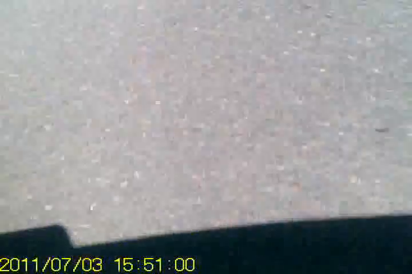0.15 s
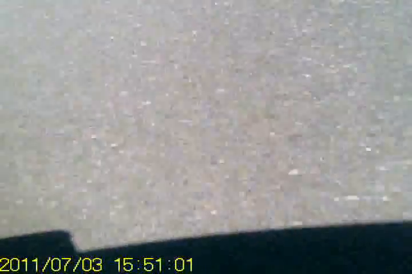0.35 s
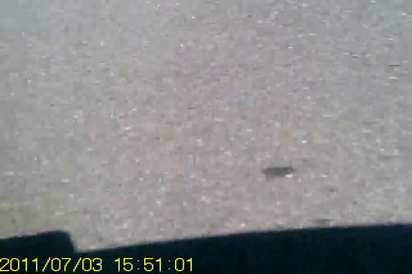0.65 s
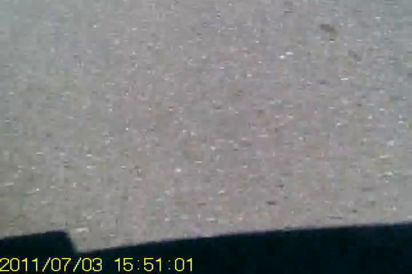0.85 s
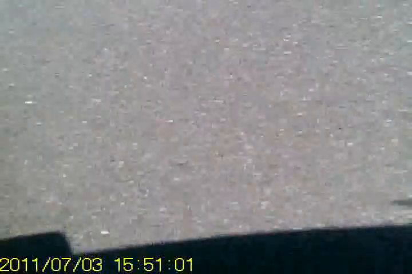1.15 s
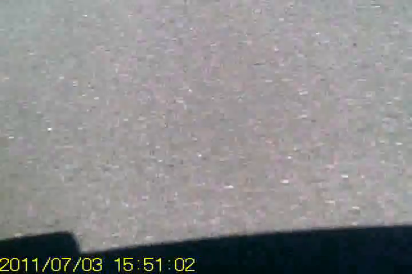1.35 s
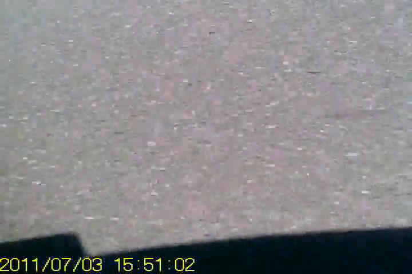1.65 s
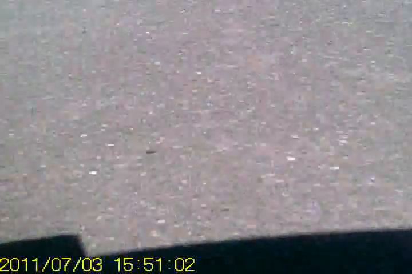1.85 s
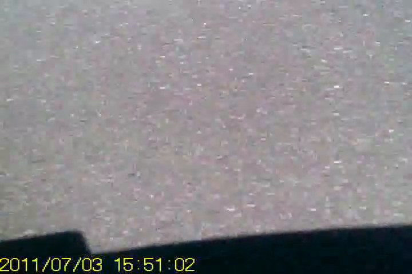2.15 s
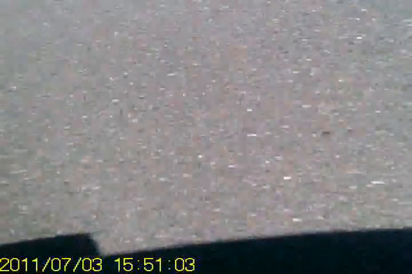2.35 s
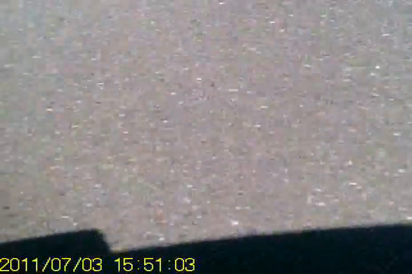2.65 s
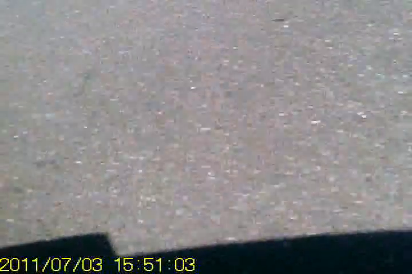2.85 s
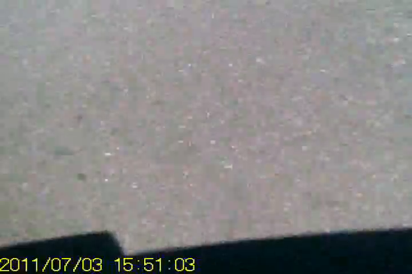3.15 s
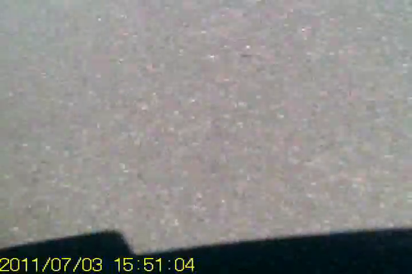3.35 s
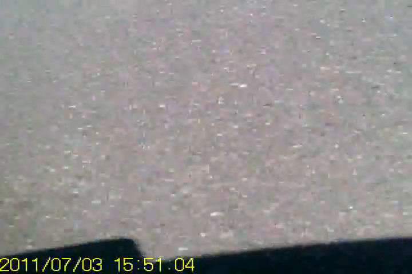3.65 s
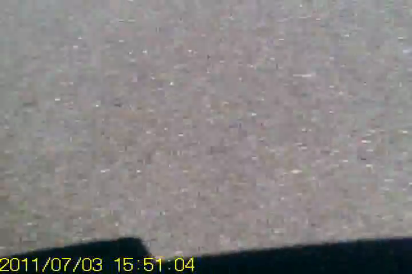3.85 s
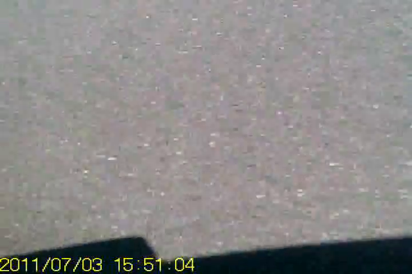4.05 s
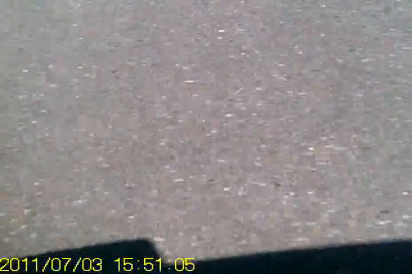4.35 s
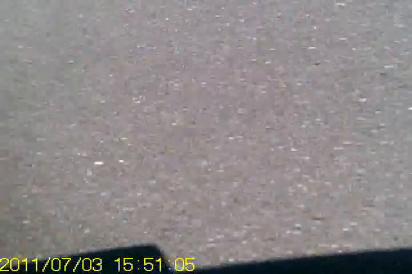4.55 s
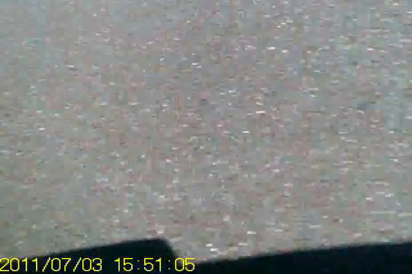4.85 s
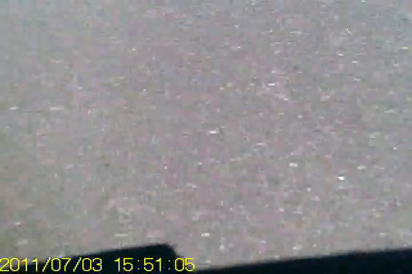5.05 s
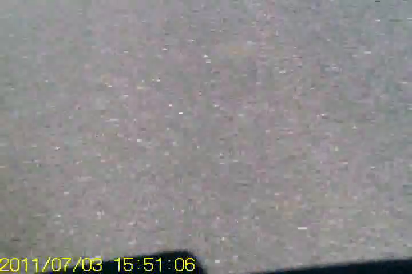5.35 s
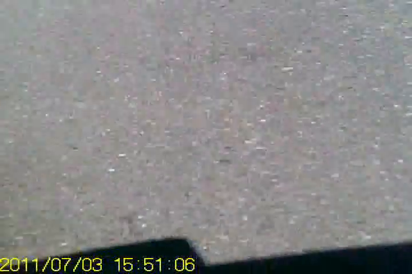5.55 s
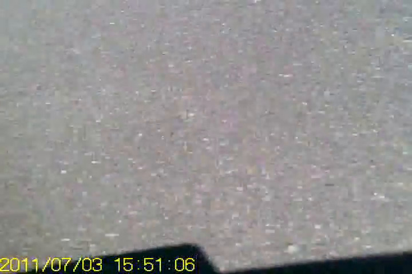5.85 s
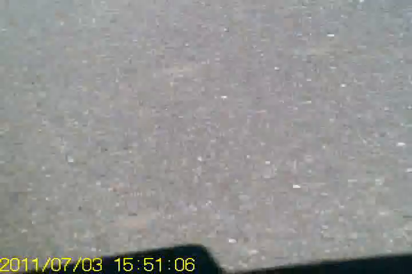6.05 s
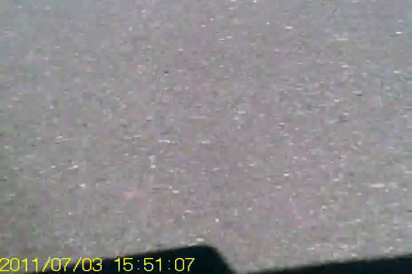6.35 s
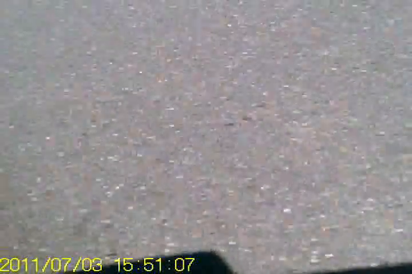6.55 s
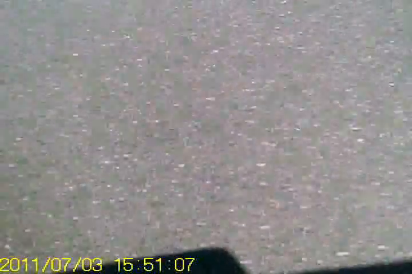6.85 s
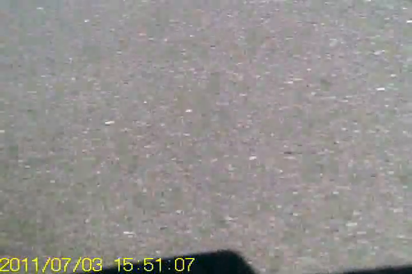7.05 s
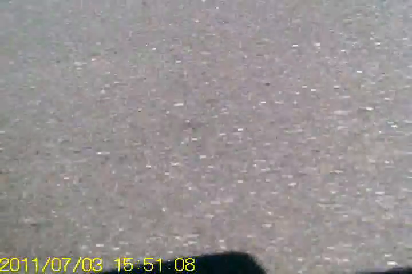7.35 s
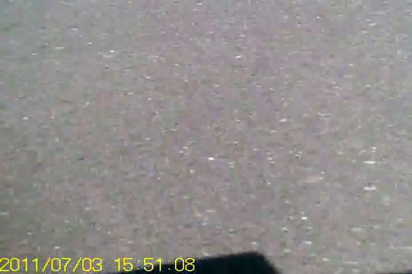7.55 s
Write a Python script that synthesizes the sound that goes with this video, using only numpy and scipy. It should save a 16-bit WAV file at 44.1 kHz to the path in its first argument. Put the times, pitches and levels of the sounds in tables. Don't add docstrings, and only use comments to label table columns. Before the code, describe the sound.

A cheap microphone rides near a small four-cylinder car's tailpipe on open road. From 0 to 3.6 seconds the engine pulls under load: after a brief initial drop, a thick low boom near 130 Hz with gritty rasp and pulsing gas hiss creeps up slightly. At 3.65 the throttle lifts and the exhaust goes soft, its pitch sagging until 4.5. A hard blip with punchy firings shoots the pitch up by 4.8; it cuts back, dips around 5.2, then rises as the engine takes up at 5.4. The rest is overrun, slowly falling, hollow and nasal, with small coughs near 5.8 and 6, and fluttering misfires after 6.2. Tyre roar grows later, wind heaves low, and faint fizzes recur roughly every 0.4 seconds. Grit ticks and bumps cluster around 4.1, 5.1 and 7.26, with a deep thump at 7.63. Very faint whistles sit underneath.

```python
import sys
import numpy as np
from scipy import signal
from scipy.fft import rfft, irfft, next_fast_len
from scipy.io import wavfile
from scipy.ndimage import uniform_filter1d

SR = 44100
rng = np.random.default_rng(int(sys.argv[2]) if len(sys.argv) > 2 else 0)


def wav_record(signal):
    frames = np.transpose(np.atleast_2d(signal))
    bounded = np.clip(frames, -1, 1)
    quanta = np.round(bounded * 32767).astype(np.int16)
    wavfile.write(sys.argv[1], SR, quanta)


def volts_from_decibels(level):
    exponent = np.asarray(level, float) / 20
    return 10 ** exponent


N = 340011

# [t/s at half way, duration/s]
STAGE_CHANGES = [
    (3.647, 0.039),
    (4.526, .03),
    (4.835, 0.037),
    (5.36, .12),
]
# [t/s, f/Hz]
CRANK_SPEED = [(0, 71.3), (.11, 64), (.5, 64.48), (3.15, 66.46), (3.48, 67.17), (3.7, 65.1), (4.22, 64.66),
               (4.4, 59.46), (4.51, 56.1), (4.6, 61.04), (4.81, 83.95), (4.9, 82.7), (5.1, 75.9),
               (5.18, 74.55), (5.33, 82.24), (5.43, 86.3), (5.7, 84.17), (7.71, 74.91)]
# [t/s, level/dB]
GAS_PUSH = [(0, 3.5), (.075, -0.5), (.105, 4), (.15, 0), (3.0, -1.5), (3.6, -2), (4.2, -0.5), (4.5, -0.5),
            (4.55, 1.5), (4.66, -2), (4.8, 0), (4.91, -4.5), (5.3, -1.5), (5.45, 1), (5.85, -2), (6.4, 0),
            (7.05, 1), (7.71, -0.5)]

STAGE_THROTTLE = (0.95, .25, 0.85, 0.15, 0.05)
# boom, mid silencer slope [level/dB]
STAGE_BOOM_DB = (-16, -25.5, -15.5, -21.5, -20.5)
STAGE_TURN_DB = (-26, -32, -23.5, -30.5, -27)
STAGE_RASP_DB = (-31, -46, -29, -28, -27.5)
STAGE_ODD_DB = (-9.5, -21, -9, -15, -7)
STAGE_PAIR_DB = (1.5, 2.5, 1.5, -12, -8)
STAGE_GAS_DB = (-7, -20, -10, -26, -24)
STAGE_HISS_DB = (-52, -56, -51.5, -56, -54)
STAGE_SHAKE_RAD = (0, .005, .035, .005, .01)

# [crank f/Hz, level/dB]
SILENCER_GAIN = [(56, 4.5), (60, 0.5), (64.5, 0.5), (68, 0.5), (73, -6.5), (84, -5)]
# [multiple, open level/dB, shut level/dB]
TURN_ORDERS = [(.5, -16.5, -9), (1.5, -8.5, -27), (2.5, -14, -28.5), (3, -0.5, -34.5), (3.5, -12, -42.5),
               (5, -12.5, -42.5), (13.5, -26.5, -23.5)]
# [f/Hz, open throttle level/dB, shut throttle level/dB]
PIPE_RESPONSE = [(200, -2.5, -16), (255, 1.5, -18.5), (320, 1.5, -6), (404, -5, -19), (460, -4.5, -15),
                 (524, -15, -4.5), (591, -4.5, 2.5), (641.6, 0, -0.5), (681, -2, 0), (745.5, 2.5, -3.5),
                 (857, -10.5, -19), (945, -20.5, -44.5), (1080, -18.5, -24), (1330, -34, -44)]
# [t/s, rasp change level/dB]
MISFIRES = [(6.215, 1.5), (6.33, 2.5), (6.449, 0), (6.56, -1.5), (6.775, -3), (6.9, -2.5), (7.105, 1.5),
            (7.144, -5), (7.21, -5), (7.365, -0.5), (7.46, -2), (7.625, 1)]
# [f/Hz, level/dB per Hz]
HISS_SPECTRUM = [(1650, -27.5), (2800, 3), (3210, -14.5), (3600, -8), (3970, -1), (4420, -1), (4890, -3.5),
                 (5830, 0), (6690, -6), (7230, -5.5), (8060, -3), (9030, -7), (9880, -3.5), (10400, -6.5),
                 (11800, -22.5), (15300, -64), (22000, -120)]
# [start t/s, end t/s, f/Hz, rms level/dB]
WHISTLE_TONES = [
    (0, 3.5, 1736, -57.5),
    (5.6, 14, 4040, -67.5),
]

# [t/s, roar level/dB]
ROAD_ROAR = [(0, -39), (.3, -43), (3.5, -42.5), (3.7, -46.5), (4.05, -44), (4.4, -43), (5.3, -42),
             (6.4, -39.5), (6.85, -40), (7.0, -37), (7.2, -38), (7.71, -38)]
# [f/Hz, level/dB per Hz]
ROAR_SPECTRUM = [(120, -27.5), (200, -5.5), (330, -6), (450, -7.5), (600, -2), (800, -7.5), (1010, -8),
                 (1490, -6.5), (1870, -13.5), (2600, -16), (3110, -26), (3600, -29.5), (4680, -36)]
# [t/s, sway level/dB, wind level/dB]
GUST_EVENTS = [(.19, 2.5, 4.5), (.55, 1, 8.5), (2.04, 9.5, -2), (2.26, 14.5, 8), (2.52, 8, -3),
               (3.45, 7, 9), (3.8, 8.5, 0.5), (4.1, 10.5, 8), (4.43, 5, 4), (4.86, 9, 1.5), (5.2, 4, -5),
               (5.47, 3, 2), (5.71, 15.5, -2), (6.1, 13.5, -2), (6.4, 12, 5), (6.58, 7.5, 6), (6.99, 18, 5),
               (7.14, 2, 6.5), (7.28, 16, 5), (7.42, 11, 9), (7.62, 17, 11.5)]
# [f/Hz, level/dB per Hz]
WIND_SPECTRUM = [(16, -11.5), (24, 5), (34, -3.5), (55, -7), (95, -9), (130, -17), (250, -26.5), (500, -37)]
# [f/Hz, level/dB per Hz]
SWAY_SPECTRUM = [(2, -16), (5, -3.5), (12, 12.5), (20, -16)]
# [t/s, rms level/dB]
STORE_EVENTS = [(.37, -67), (0.78, -58), (1.214, -54.5), (1.613, -63), (2.043, -50.5), (2.482, -54.5),
                (2.87, -54), (3.307, -51), (3.773, -53), (4.201, -54), (4.591, -61), (5.044, -49.5),
                (5.47, -51), (5.908, -50.5), (6.307, -49.5), (6.72, -56), (6.99, -51), (7.049, -52.5),
                (7.14, -52.5), (7.49, -52)]
# [f/Hz, level/dB per Hz]
FIZZ_SPECTRUM = [(1500, 4), (3000, 0.5), (9500, -0.5), (11000, -16), (12300, -10.5)]
# [t/s, peak level/dB, ring f/Hz]
GRIT_TICKS = [
    (3.768, -53, 4500),
    (4.085, -40, 4060),
    (4.148, -38, 4500),
    (4.292, -33.5, 2890),
    (5.095, -44, 5000),
    (5.117, -35, 3320),
    (7.258, -32, 3400),
    (7.275, -35, 3616),
]
# [t/s, peak level/dB, ring f/Hz]
BUMP_KNOCKS = [
    (4.06, -29, 230.3),
    (4.092, -16.5, 69.6),
    (4.15, -25, 252),
    (4.547, -16.5, 360),
    (4.6, -22, 333.5),
    (4.647, -19.5, 320),
    (4.87, -30, 149.7),
    (5.12, -26, 200),
    (7.265, -16, 190.7),
    (7.635, -16, 60.3),
]


def rms_one(x):
    return x / np.sqrt(np.mean(x ** 2) + 1e-20)


def drift(rate_hz):
    hop = 40
    r = np.exp(-2 * np.pi * rate_hz * hop / SR)
    noise = rng.standard_normal(N // hop + 2002)
    slow = signal.lfilter([1], [1, -2 * r, r * r], noise)[2000:]
    return np.interp(np.arange(N) / hop, np.arange(len(slow)), rms_one(slow))


def coloured(spectrum):
    hz, db = np.transpose(spectrum)
    size = next_fast_len(N)
    log_hz = np.log(np.arange(size // 2 + 1) * SR / size + .1)
    knots = np.log([hz[0] / 2, *hz, hz[-1] * 1.2])
    shape_db = np.interp(log_hz, knots, [db[0] - 40, *db, db[-1] - 110])
    return rms_one(irfft(rfft(rng.standard_normal(size)) * volts_from_decibels(shape_db), size)[:N])


def in_time(rows):
    return np.interp(np.arange(N) / SR, *np.transpose(rows))


def by_stage(values):
    s, takes_s = np.transpose(STAGE_CHANGES)
    edges_s = np.ravel([s - takes_s / 2, s + takes_s / 2], order="F")
    return np.interp(np.arange(N) / SR, edges_s, np.repeat(values, 2)[1:-1])


def by_throttle(throttle, open_db, shut_db):
    return shut_db + throttle * (open_db - shut_db)


def swells(times_s, heights_db, width_s):
    t = np.arange(N) / SR
    return sum(db * np.exp(-((t - s) / width_s) ** 2) for s, db in zip(times_s, heights_db))


def ramp(span_s, db):
    return np.interp(np.arange(N) / SR, span_s, [0, db])


def per_firing(angle):
    firing = (angle / np.pi).astype(int)
    return rng.standard_normal(firing[-1] + 1)[firing]


def boom(angle, turn_db, boom_db, throttle):
    out = -volts_from_decibels(boom_db + .5 * drift(32)) * np.sin(2 * angle)
    out -= volts_from_decibels(turn_db + .61 * drift(12)) * np.sin(angle + .038)
    for k, open_db, shut_db in TURN_ORDERS:
        level_db = turn_db + by_throttle(throttle, open_db, shut_db) + .72 * drift(5.4)
        out -= volts_from_decibels(level_db) * np.sin(k * (angle + .3) + .2 * drift(3))
    return np.sqrt(2) * out


def pipe_orders(angle, crank_hz, throttle, odd_db, pair_db):
    hz, open_db, shut_db = np.transpose(PIPE_RESPONSE)
    step = slice(None, None, 64)
    everywhere = np.arange(N)
    coarse, lines, power = everywhere[step], 0, 0
    for half in [8, 9, *range(11, 36)]:
        k = half / 2
        log_hz = np.log(k * crank_hz[step])
        pipe_open_db = np.interp(log_hz, np.log(hz), open_db)
        pipe_shut_db = np.interp(log_hz, np.log(hz), shut_db)
        level_db = by_throttle(throttle[step], pipe_open_db, pipe_shut_db)
        if half % 2:
            level_db += by_throttle(throttle[step], open_db=-21, shut_db=-42.5)
        elif half % 4:
            level_db += odd_db[step]
        elif half % 8:
            level_db += pair_db[step]
        power = power + volts_from_decibels(level_db) ** 2 / 2 * (abs(log_hz - np.log(670)) < .25)
        gain = volts_from_decibels(level_db + .8 * drift(6)[step])
        lag = -.12 if half < 14 else 1.7
        swing = .57 * np.arctan((log_hz - np.log(655)) / .13)
        phase = swing - lag * k + np.radians(9) * drift(6.4)[step]
        gain = np.interp(everywhere, coarse, gain)
        phase = np.interp(everywhere, coarse, phase)
        lines = lines - gain * np.sin(k * angle + phase)
    return lines / np.interp(everywhere, coarse, np.sqrt(power))


def pipe_gas(angle, throttle):
    hz, open_db, shut_db = np.transpose(PIPE_RESPONSE)
    puff = volts_from_decibels(.77 * np.cos(2 * angle - 3.4) + .5 * drift(23))
    gas_open = coloured(list(zip(hz, open_db)))
    gas_shut = coloured(list(zip(hz, shut_db)))
    return puff * (throttle * gas_open + (1 - throttle) * gas_shut)


def rasp(angle, crank_hz, rasp_db, throttle, odd_db, pair_db, gas_db):
    lines = pipe_orders(angle, crank_hz, throttle, odd_db, pair_db)
    strength_db = (.3 + .4 * throttle) * per_firing(angle)
    strength = uniform_filter1d(volts_from_decibels(strength_db), 90)
    return volts_from_decibels(rasp_db) * (volts_from_decibels(-.65) * lines * strength + volts_from_decibels(gas_db) * pipe_gas(angle, throttle))


def misfire_rush():
    t, out = np.arange(N) / SR, 0
    for s, _ in MISFIRES:
        before_s, after_s = np.minimum(t - s, 0), np.maximum(t - s, 0)
        out = out + .3 * np.exp(before_s / .05 - after_s / .012)
    return out


def hiss(angle, hiss_db, throttle):
    uneven = uniform_filter1d(per_firing(angle), 80)
    puffs_db = 3.4 * np.cos(2 * angle) + 3.3 * np.cos(angle) + .55 * np.cos(angle / 2) + 1.3 * uneven
    puffs_db *= .42 + .42 * throttle
    puffs = rms_one(volts_from_decibels(puffs_db + .31 * drift(20)))
    return volts_from_decibels(hiss_db + .5) * puffs * coloured(HISS_SPECTRUM)


def whistles():
    t, out = np.arange(N) / SR, 0
    for start_s, end_s, hz, rms_db in WHISTLE_TONES:
        gate = np.clip(np.minimum(t - start_s, end_s - t) / .25, 0, 1)
        phase = 2 * np.pi * hz * np.cumsum(1 + .003 * drift(12)) / SR
        out = out + np.sqrt(2) * volts_from_decibels(rms_db + 1.1 * drift(5.5)) * gate * np.sin(phase)
    return out


def engine(angle, crank_hz, throttle):
    push_db = in_time(GAS_PUSH)
    revving_hz = throttle * (crank_hz - 65)
    easing_db = ramp((3.58, 3.63), -7) * by_stage([1, 0, 0, 0, 0])

    boom_db = by_stage(STAGE_BOOM_DB) + push_db + easing_db
    boom_db += np.interp(crank_hz, *np.transpose(SILENCER_GAIN))
    boom_db += swells((3.657, 4.855), (-11, -10), width_s=.013)
    turn_db = by_stage(STAGE_TURN_DB) + push_db

    rasp_db = by_stage(STAGE_RASP_DB) + 1.5 * push_db
    rasp_db += swells((3.69, 4.853), (-10, -16), width_s=.018)
    rasp_db += swells(*np.transpose(MISFIRES), width_s=.012)
    evening_db = -12 * np.maximum(np.arange(N) / SR - 6.15, 0)
    odd_db = by_stage(STAGE_ODD_DB) + .12 * revving_hz + evening_db
    gas_db = by_stage(STAGE_GAS_DB) + ramp((5.64, 6.24), 14.5)
    gas_db += swells((5.8, 5.965), (14, 14), width_s=.02)
    hiss_db = by_stage(STAGE_HISS_DB) + .4 * push_db + easing_db + .2 * revving_hz

    rasp_angle = angle + misfire_rush() + by_stage(STAGE_SHAKE_RAD) * drift(35)
    out = boom(angle, turn_db, boom_db, throttle)
    out += rasp(rasp_angle, crank_hz, rasp_db, throttle, odd_db, by_stage(STAGE_PAIR_DB), gas_db)
    return out + hiss(angle, hiss_db, throttle)


def tyres(angle):
    throb = volts_from_decibels(1.13 * drift(23) + .8 * np.cos(2 * angle))
    return volts_from_decibels(in_time(ROAD_ROAR) + 3) * rms_one(throb * coloured(ROAR_SPECTRUM))


def wind():
    gust_s, sway_over_db, wind_over_db = np.transpose(GUST_EVENTS)
    sway_db = -34.5 + swells(gust_s, sway_over_db, width_s=.098)
    wind_db = -32.5 + swells(gust_s, wind_over_db, width_s=.098)
    lumps = rms_one(coloured(WIND_SPECTRUM) * volts_from_decibels(1.2 * drift(1.7))) * volts_from_decibels(wind_db + 3.5)
    heave = volts_from_decibels(sway_db) * coloured(SWAY_SPECTRUM)
    return lumps + heave - np.mean(heave)


def fizz():
    t, gate = np.arange(N) / SR, np.zeros(N)
    for s, rms_db in STORE_EVENTS:
        first = (t > s - .012) & (t < s - .0015)
        second = (t > s + .0015) & (t < s + .021)
        gate += volts_from_decibels(rms_db) * (first | second)
    return uniform_filter1d(gate, 50) * coloured(FIZZ_SPECTRUM)


def knocks(table, decay_cycles):
    out, t = np.zeros(N + 4000), np.arange(4000) / SR
    for s, peak_db, hz in table:
        at = round(s * SR)
        ring = np.exp(-t * hz / decay_cycles) * np.sin(2 * np.pi * hz * t)
        out[at:at + len(t)] += volts_from_decibels(peak_db) * ring
    return out[:N]


def scene():
    crank_hz = in_time(CRANK_SPEED)
    angle = 2 * np.pi * np.cumsum(crank_hz) / SR
    throttle = np.clip(by_stage(STAGE_THROTTLE), 0, 1)
    car = engine(angle, crank_hz, throttle) + whistles()
    road = tyres(angle) + knocks(GRIT_TICKS, decay_cycles=3.5) + knocks(BUMP_KNOCKS, decay_cycles=1.6)
    return (car + road + wind() + fizz())[None]


def top_cut(x):
    return signal.sosfilt(signal.butter(12, 11910, fs=SR, output="sos"), x)


def record(dry):
    overload = .9
    mix = overload * np.tanh(dry / overload) - .0067
    return top_cut(mix)


dry = scene()
out = record(dry)
wav_record(out)
```